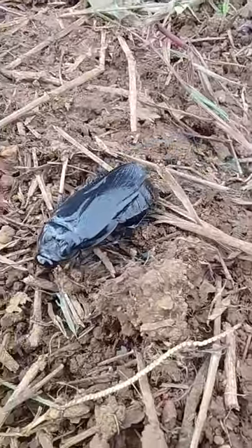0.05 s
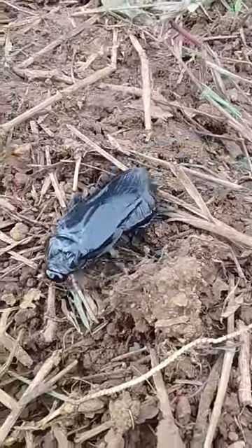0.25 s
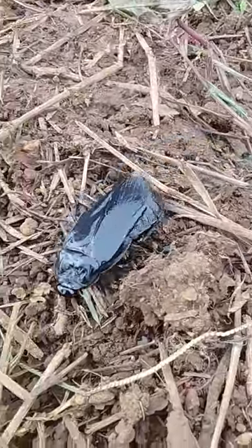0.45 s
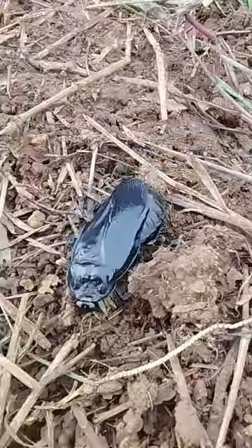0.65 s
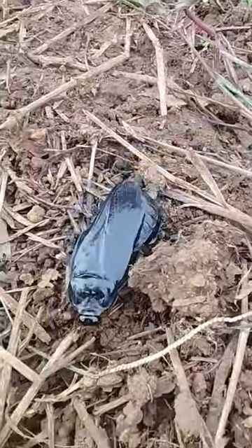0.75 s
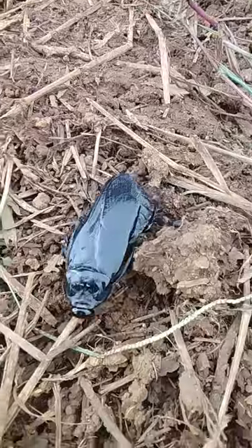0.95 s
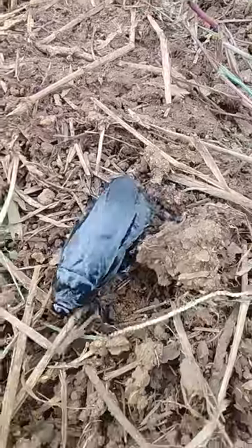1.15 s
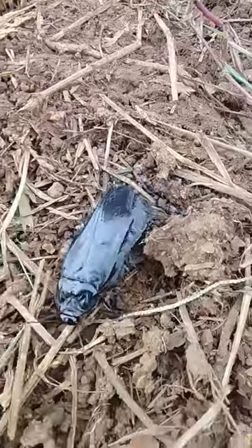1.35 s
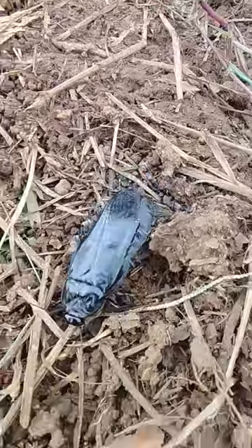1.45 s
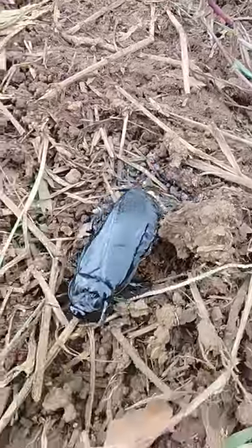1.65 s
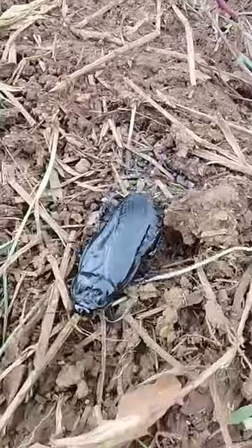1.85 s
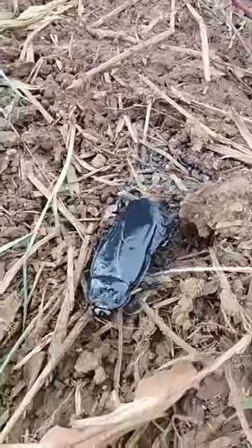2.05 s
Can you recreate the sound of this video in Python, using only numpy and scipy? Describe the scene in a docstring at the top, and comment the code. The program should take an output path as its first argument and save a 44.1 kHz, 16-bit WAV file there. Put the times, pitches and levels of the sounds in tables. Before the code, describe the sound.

A large cockroach scratches through dry straw, snapping stalks, with puffs of wind.

```python
"""Outdoors, down in dry straw and crumbs of soil, a large cockroach pushes past a small microphone.
Its spiny legs scratch over the ground and tick on the straw, and its belly scuffs the litter.
Stalks snap with a crack, a brief ring and a hollow knock; a thick one crunches as it gives way.
Puffs of wind rumble and thump on the microphone over a quiet, steady bed of open air."""
import sys
import numpy as np
from scipy import signal
from scipy.fft import rfft, irfft
from scipy.io import wavfile
from scipy.ndimage import uniform_filter1d

SR = 44100
rng = np.random.default_rng(int(sys.argv[2]) if len(sys.argv) > 2 else 0)


def transcribe(u):
    """Save the signal u as a 16-bit wav file named by the first command-line argument.

    u: samples, shape (n,) or (channels, n), limited to [-1, 1]; the rate is SR.
    q: integer samples, one column per channel.
    """
    v = np.clip(np.atleast_2d(u).T, -1, 1)
    q = np.round(v * 32767).astype(np.int16)
    wavfile.write(sys.argv[1], SR, q)


N = 92610
T = np.arange(N) / SR

# tone of the open-air bed (frequency [Hz], relative level [dB])
AIR_EQ = [(40, -10), (130, 3), (300, -2.5), (750, -9), (1650, -18.5), (2200, -23), (3700, -28), (6000, -35),
          (7900, -25), (9500, -38.5), (16000, -51.5)]
# fader ride of that bed (time [s], level [dB])
AIR_RIDE = [(0, -65.5), (.7, -62.5), (.95, -59), (1.4, -60), (1.7, -64.5), (2.1, -66)]
# puffs of wind on the microphone (time [s], spread [s], level [dB], upper corner [Hz])
WIND_PUFFS = [(.41, 0.021, -53.5, 64.5), (0.513, 0.02, -46, 66.3), (0.607, 0.013, -44.5, 72),
              (0.734, 0.037, -41.5, 74), (0.835, 0.024, -37.5, 111), (0.902, 0.011, -32.5, 164),
              (0.939, 0.018, -26, 150), (1.04, 0.02, -32, 119), (1.105, 0.042, -43, 77),
              (1.21, 0.011, -39, 161), (1.349, 0.014, -40.5, 106), (1.417, 0.014, -34.5, 130),
              (1.524, 0.031, -35.5, 80.6), (1.63, 0.073, -54, 65.4), (1.805, 0.032, -47, 69)]
# single buffets of air that thump the microphone (time [s], level [dB], pitch [Hz])
WIND_THUMPS = [(.881, -27, 167), (0.9279, -27.5, 245), (0.9565, -23, 200), (1.007, -20.5, 139)]
# fader ride of the legs scratching over soil (time [s], level [dB])
SCRATCH_RIDE = [(0, -88.5), (.38, -79), (.7, -78), (.95, -77), (1.25, -74), (1.6, -74), (1.95, -71),
                (2.1, -73.5)]
# bands of scratchy ticking, low to high: ringing straw, dry crackle, a bright microphone resonance
# (centre [Hz], width [Hz], relative level [dB])
SCRATCH_BANDS = [(1665, 235, -6.5), (3220, 5100, -5.5), (5570, 3000, -8.5), (7730, 1800, -3.5),
                 (12300, 6700, -9.5)]
# tone of a dry crack (frequency [Hz], relative level [dB])
CRACK_EQ = [(150, -6.5), (700, 11.5), (1700, 5.5), (2300, 6.5), (3400, 4.5), (5800, 1.5), (7000, 0.5),
            (7900, 13), (9500, -6.5), (12000, -1.5), (16000, -0.5)]
# sharp ticks of claws and leg spines (time [s], level [dB], pitch [Hz])
CLAW_TICKS = [(.0085, -51.5, 14400), (.2530, -59, 8000), (0.3142, -62, 3520), (0.4045, -56.5, 1170),
              (0.5013, -56.5, 7560), (.5790, -57, 8200), (.632, -64, 12000), (0.8994, -55, 1570),
              (.9240, -54.5, 1580), (.9510, -57, 7400), (0.9655, -55.5, 9500), (0.9910, -54, 7400),
              (1.0022, -54, 8700), (1.022, -56, 7050), (1.0365, -57, 9000), (1.0620, -54.5, 2820),
              (1.134, -64, 7360), (1.2238, -56, 7350), (1.2694, -54, 7300), (1.2808, -58, 4940),
              (1.6926, -53, 1380), (1.8040, -53, 7100)]
# snapping stalks, levels before EQ
# (time [s], ring pitch [Hz], ring level [dB], ring t60 [s], knock [dB], crack [dB], crack high cut [Hz])
STALK_SNAPS = [(0.2677, 777, -42.5, 0.011, -27.5, -45.5, 15800),
               (0.6553, 2820, -45, 0.0095, -27.5, -47.5, 5000), (1.1060, 318, -32.5, 0.017, -24, -39, 8100),
               (1.205, 555, -47.5, 0.01, -60, -42.5, 7000), (1.3087, 1760, -38, 0.0056, -48, -42.5, 9100),
               (1.4140, 2220, -23.5, 0.011, -22, -25, 12000), (1.459, 948, -34, 0.011, -20, -31, 13900),
               (1.5009, 1070, -55, 0.016, -30.5, -37, 2500),
               (1.5243, 1600, -46.5, 0.014, -28.5, -30.5, 3820),
               (2.0777, 3540, -48, 0.011, -38, -38.5, 16200)]
# hollow response of the litter under a snapping stalk (frequency [Hz], relative level [dB])
LITTER_EQ = [(120, 8.5), (350, 3), (700, 1), (1200, 3), (1680, 3.5), (2000, -11), (2500, -24), (3400, -12),
             (5000, -64.5), (12000, -23)]
# the belly rubbing over the litter (time [s], spread [s], level [dB])
BELLY_SCUFFS = [(0.83, 0.047, -70.5), (0.952, 0.0048, -51.5), (1.21, 0.0027, -53), (1.447, 0.016, -58)]
# dull tone of that rub (frequency [Hz], relative level [dB])
SCUFF_EQ = [(120, 14.5), (300, 11), (650, 6), (1100, 4), (1750, -13), (12000, -17.5)]
# fibres tearing around the main snap (time [s], spread [s], level [dB])
FIBRE_TEARS = [(1.4123, 0.0022, -37.5), (1.4202, .0013, -43)]
# tone of the tearing fibres (frequency [Hz], relative level [dB])
TEAR_EQ = [(200, -28), (1100, 1), (1850, 15), (2700, 5), (4200, 3), (6000, -3), (7900, 11), (9800, -2.5),
           (16000, -18.5)]
# hollow ring of the thick stalk that gives way (pitch [Hz], level [dB])
THICK_STALK_MODES = [(780, -36.5), (1440, -52), (1650, -34), (1840, -40.5), (4570, -52)]


def undb(db):
    """Decibels to gain."""
    return 10 ** (np.asarray(db) / 20)


def unit(x):
    """Scale to rms 1."""
    return x / np.sqrt(np.mean(x ** 2))


def ride(points):
    """A fader move through (time [s], level [dB]) points."""
    return undb(np.interp(T, *np.array(points).T))


def eq(x, points, size=4096):
    """Minimum-phase EQ of unit power through (frequency [Hz], relative level [dB]) points."""
    hz, db = np.array(points, float).T
    bin_hz = np.arange(size // 2 + 1) * SR / size + 1
    gain = unit(undb(np.interp(np.log(bin_hz), np.log(hz), db)))
    cepstrum = irfft(np.log(gain))
    cepstrum[1:size // 2] *= 2
    cepstrum[size // 2 + 1:] = 0
    return signal.fftconvolve(x, irfft(np.exp(rfft(cepstrum))))[:N]


def band(x, hz, width):
    """Resonant band-pass."""
    return signal.lfilter(*signal.iirpeak(min(hz, .45 * SR), hz / width, fs=SR), x)


def add(out, at, x):
    """Drop a short sound onto the track at a time."""
    i = int(np.clip(at * SR, 0, N - 1))
    out[i:i + len(x)] += x[:N - i]


def fade(t60, size=2048):
    """Exponential decay, 60 dB down after t60 seconds."""
    return np.exp(-np.log(1000) * T[:size] / t60)


def ring(hz, t60):
    """One damped mode."""
    decay = fade(t60)
    return decay * np.sin(2 * np.pi * hz * T[:len(decay)])


def swell(at, spread):
    """Bell-shaped rise and fall."""
    return np.exp(-.5 * ((T - at) / spread) ** 2)


def grains(per_s, spread_db):
    """Random clicks; a wider spread makes a few stand out."""
    hits = rng.random(N) < per_s / SR
    sizes = np.minimum(rng.exponential(size=N), 4.5)
    return unit(hits * rng.choice([-1, 1], N) * undb(spread_db * sizes))


def open_air():
    """A quiet bed of air and hiss that lifts a little in the middle."""
    return ride(AIR_RIDE) * unit(eq(rng.standard_normal(N), AIR_EQ))


def turbulence(corner_hz, slope_db_per_oct=16.5, low_cut_hz=11.6, high_cut_hz=577):
    """Low eddies, levelled to an even strength and rolling off steeply above a corner."""
    hz = np.arange(N // 2 + 1) * SR / N + 1
    rolloff = (1 + undb(slope_db_per_oct * np.log2(hz / corner_hz)) ** 2) ** -.5
    low_cut = hz / np.hypot(hz, low_cut_hz)
    eddies = irfft(rfft(rng.standard_normal(N)) * rolloff * low_cut, N)
    eddies = signal.sosfilt(signal.butter(4, high_cut_hz, fs=SR, output="sos"), eddies)
    power = uniform_filter1d(uniform_filter1d(eddies ** 2, size=1400), size=1400)
    return eddies / np.sqrt(power)


def wind(breeze_db=-59.5, thump_spread_cycles=0.26):
    """Air hits the microphone: a faint breeze, short thumps and puffs, the stronger ones brighter."""
    puffs = sum(undb(db) * swell(at, spread) * turbulence(hz) for at, spread, db, hz in WIND_PUFFS)
    thumps = sum(undb(db) * swell(at, thump_spread_cycles / hz) * np.cos(2 * np.pi * hz * (T - at))
                 for at, db, hz in WIND_THUMPS)
    return puffs + thumps + undb(breeze_db) * turbulence(corner_hz=39.2)


def leg_scratches(jerks_per_s=83, jerk_spread_db=3):
    """Legs drag jerkily over soil and straw: bands of scratchy ticking, sprinkled with dry cracks."""
    ticking = np.zeros(N)
    for hz, width, db in SCRATCH_BANDS:
        clicks = band(grains(per_s=300, spread_db=3.5), hz, width)
        ticking += undb(db) * unit(band(clicks, hz, 2 * width))
    cracks = undb(-3) * eq(grains(per_s=330, spread_db=2.5), CRACK_EQ)
    jerks = np.interp(T * jerks_per_s, np.arange(N), np.clip(rng.standard_normal(N), -2, 2))
    return ride(SCRATCH_RIDE) * undb(jerk_spread_db * jerks) * (ticking + cracks)


def crack():
    """A tiny burst of breaking fibres, always of the same energy."""
    decay = fade(t60=0.0051)
    return unit(decay * rng.standard_normal(len(decay))) * np.sqrt(np.mean(decay ** 2))


def claw_ticks(crack_boost_db=1.5):
    """Claws catch on straw: a pitched tick layered with a dry crack."""
    rings, cracks = np.zeros(N), np.zeros(N)
    for at, db, hz in CLAW_TICKS:
        burst = crack()
        add(rings, at, undb(db) * unit(band(burst, hz, width=0.17 * hz)) * np.std(burst))
        add(cracks, at, undb(db + crack_boost_db) * burst)
    return rings + eq(cracks, CRACK_EQ)


def stalk_snaps(rattle_vs_knock_db=-2):
    """Each stalk cracks, rings, recoils against the litter and leaves loose straw rattling."""
    body, cracks = np.zeros(N), np.zeros(N)
    tail = fade(t60=0.018)
    for at, hz, ring_db, t60, knock_db, crack_db, high_cut_hz in STALK_SNAPS:
        rattle = tail * rng.standard_normal(len(tail))
        add(body, at, undb(ring_db) * ring(hz, t60))
        add(body, at, -undb([knock_db]))  # the recoil is a single impulse
        add(body, at, undb(knock_db + rattle_vs_knock_db) * rattle / np.linalg.norm(rattle))
        high_cut = signal.butter(1, high_cut_hz, fs=SR)
        add(cracks, at, undb(crack_db) * signal.lfilter(*high_cut, crack()))
    return eq(body, LITTER_EQ) + eq(cracks, CRACK_EQ)


def belly_scuffs(straw_db=-7):
    """Soft, dull rubs of the body against the litter set a straw ringing."""
    pressure = sum(undb(db) * swell(at, spread) for at, spread, db in BELLY_SCUFFS)
    rub = grains(per_s=3300, spread_db=-0.5)
    straw = unit(band(rub, hz=1625, width=64))
    return eq(pressure * rub, SCUFF_EQ) + undb(straw_db) * pressure * straw


def stalk_crunch(break_s=1.414):
    """Fibres tear in a dense run as the thick stalk gives way and rings hollow."""
    strain = sum(undb(db) * swell(at, spread) for at, spread, db in FIBRE_TEARS)
    crunch = eq(strain * grains(per_s=17000, spread_db=5), TEAR_EQ)
    add(crunch, break_s, sum(undb(db) * ring(hz, t60=0.026) for hz, db in THICK_STALK_MODES))
    return crunch


def scene():
    """The mono mix: air and wind under the close-up sounds of the insect."""
    ambience = open_air() + wind()
    insect = leg_scratches() + claw_ticks() + stalk_snaps() + belly_scuffs() + stalk_crunch()
    return (ambience + insect)[None]


def record(dry, high_cut_hz=15900, dc_offset=0.0058):
    """The recorder shaves off the very top and rests slightly off zero."""
    return signal.sosfilt(signal.ellip(8, .2, 70, high_cut_hz, fs=SR, output="sos"), dry) + dc_offset


dry = scene()
out = record(dry)
transcribe(out)
```